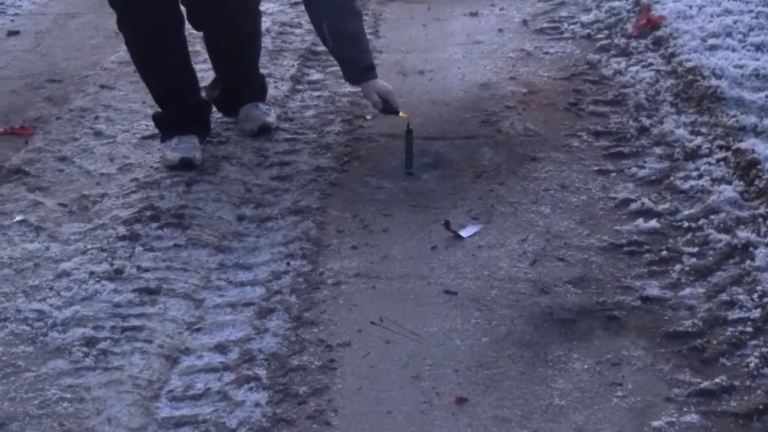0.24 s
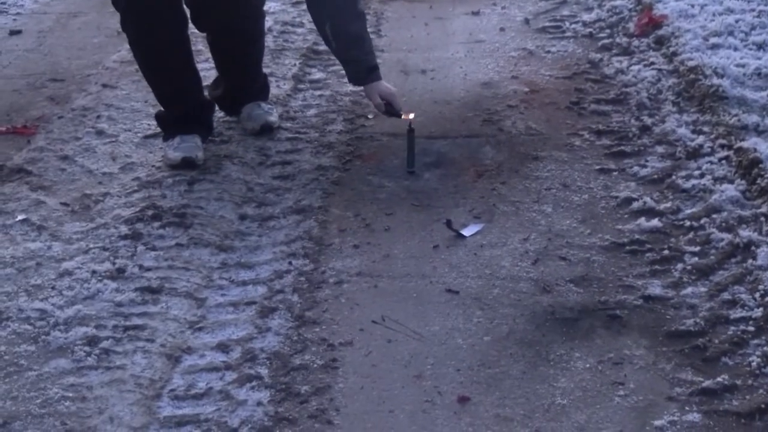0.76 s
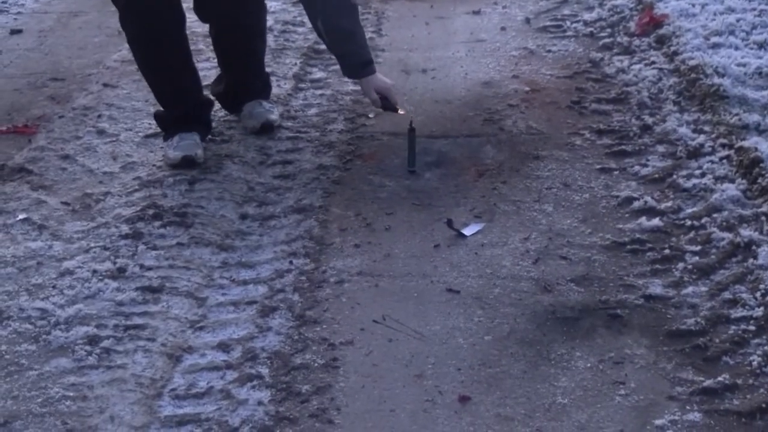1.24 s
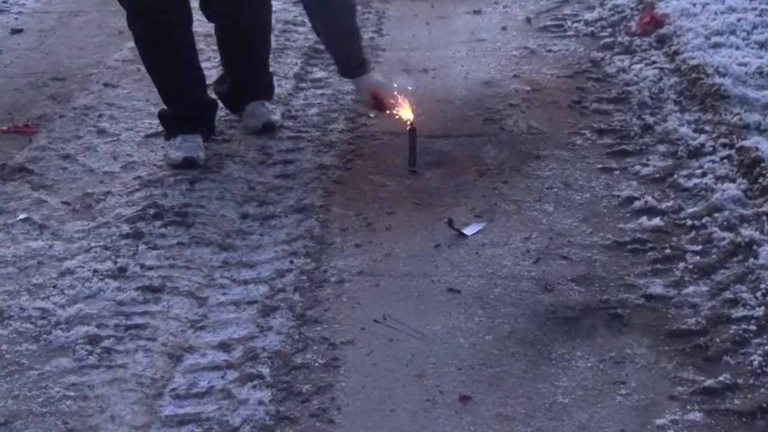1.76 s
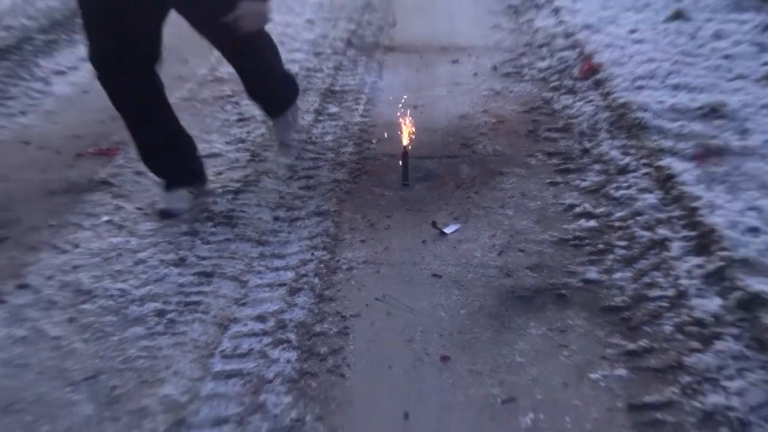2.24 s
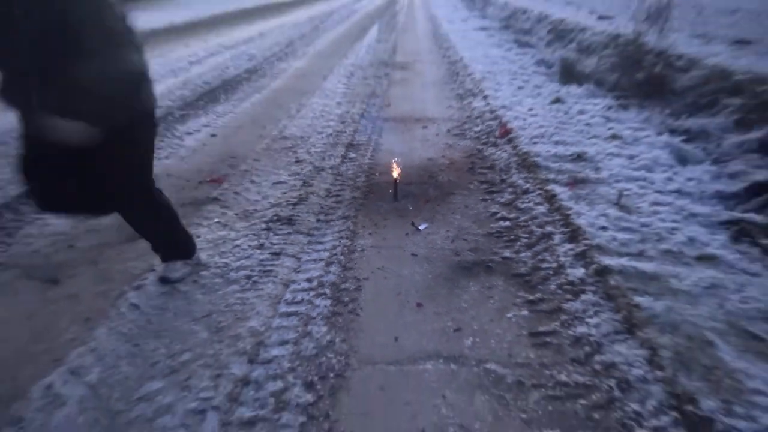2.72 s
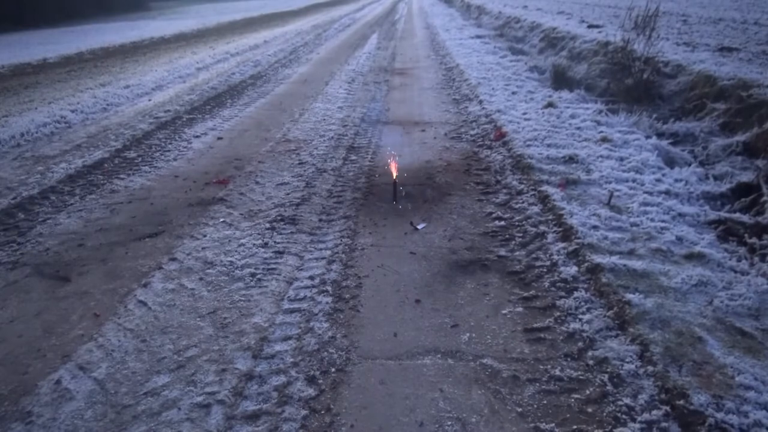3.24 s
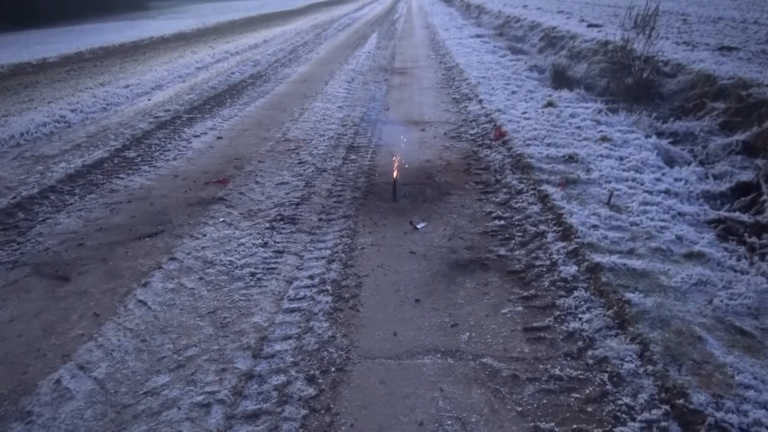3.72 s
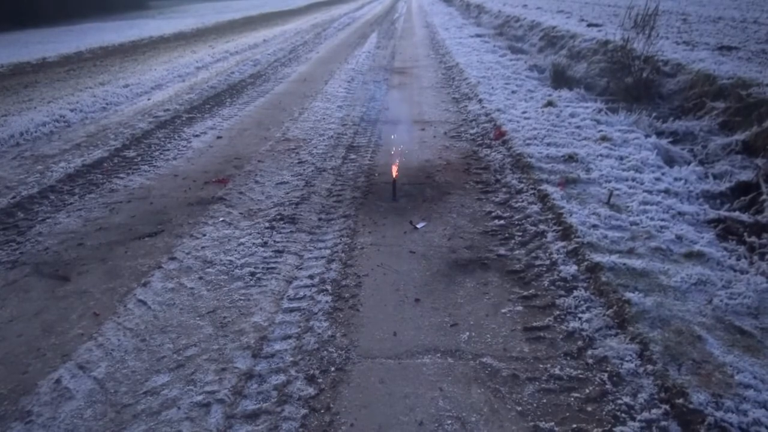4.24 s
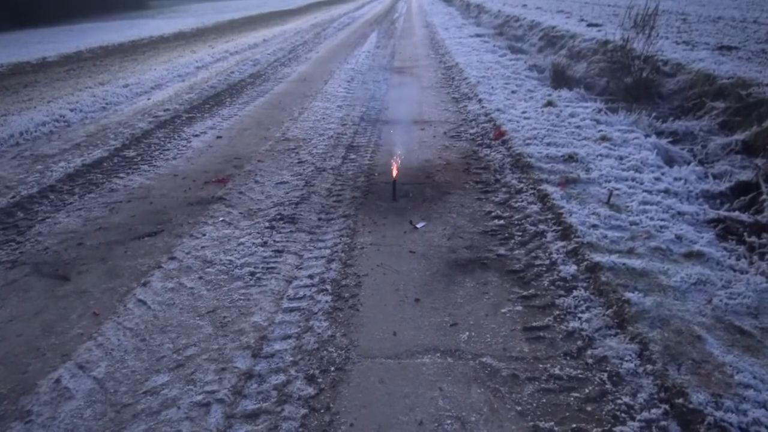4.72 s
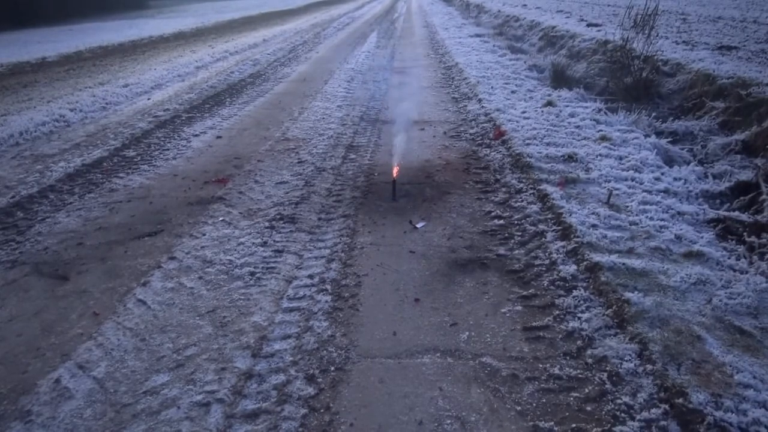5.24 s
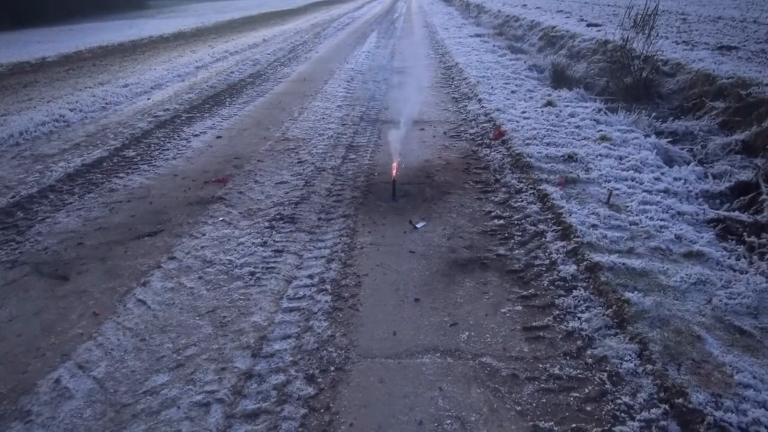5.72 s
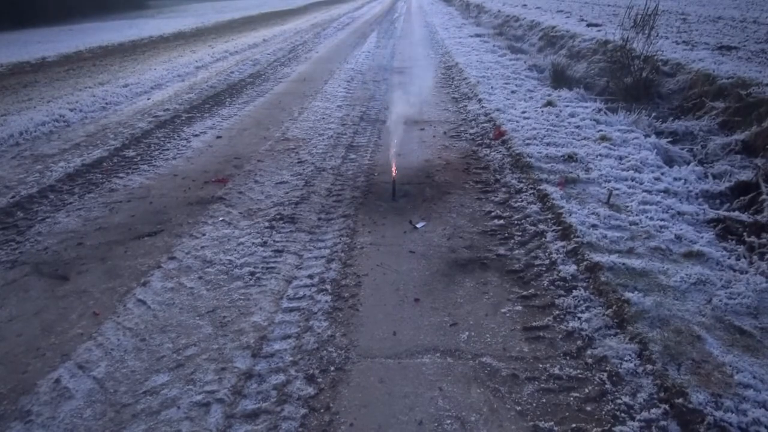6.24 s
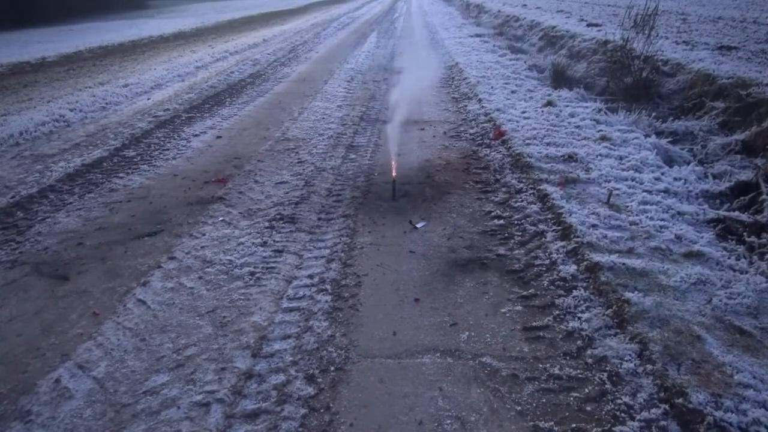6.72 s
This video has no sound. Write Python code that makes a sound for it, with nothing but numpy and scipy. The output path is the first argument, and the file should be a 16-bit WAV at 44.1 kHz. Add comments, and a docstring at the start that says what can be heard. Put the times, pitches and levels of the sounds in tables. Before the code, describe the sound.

Right at the start a lighter snaps with a short, sharp metallic ring, the loudest sound, slightly to the right. Faint dry ticks and soft sleeve rustles follow. At about 1.6 seconds a firework fuse catches and builds into a bright, sputtering hiss that lasts to the end near 7 seconds, turning softer and duller from about 5 seconds. From 2 seconds someone runs past from right to left, with dull heel knocks, scraping soles and gritty crunches of frost, strongest around 3 seconds and fading after 4. From about 4 to 6.5 seconds lighter feet shift and crunch close by on the right. Soft, deep handling bumps nudge the microphone near 0.6 seconds and again between 2 and 3.5 seconds, when a low wind rumble swells a little. Quiet open air with a far hum lies underneath throughout.

```python
"""An open frosty field. A lighter snaps with a short metallic ring, and a sleeve rustles among dry ticks.
At 1.6 s a firework fuse catches and hisses to the end, its echo off the frozen ground combing the hiss.
From 2 s someone runs past, right to left, heels knocking and frost crunching; then lighter feet shift
on the right. Wind and soft handling bumps nudge the microphone, over still air and a far hum."""
import sys
import numpy as np
from scipy import signal
from scipy.fft import rfft, irfft
from scipy.io import wavfile
from scipy.ndimage import uniform_filter1d

SR = 44100
rng = np.random.default_rng(int(sys.argv[2]) if len(sys.argv) > 2 else 0)


def wrap_up_sound(samples):
    """Save the sound to the file named by the first command line argument, as 16-bit audio."""
    columns = np.atleast_2d(samples).T
    # keep every value between -1 and 1, then stretch to whole-number steps
    tamed = np.clip(columns, -1, 1)
    steps = np.round(tamed * 32767).astype(np.int16)
    wavfile.write(sys.argv[1], SR, steps)


N = 307377
T = np.arange(N) / SR

# the runner's path; every pan is left minus right: (time [s], scuff level [dB], pan [dB])
RUNNER = [(1.7, -38, -10), (1.9, -55, -7), (2.24, -52, -7), (2.4, -47, -7.5), (3.2, -48.5, -2),
          (3.8, -49, 6.5), (4.05, -55.5, 9), (4.2, -51, 16), (4.7, -61.5, 10), (5.3, -63.5, 10),
          (6.3, -63, -5)]
NEAR_PAN_DB = -11  # feet shifting close by, on the right


def fuse():
    """A sputtering gas jet plus its delayed ground echo, which combs the hiss."""
    # the burn: (time [s], level [dB], tilt above 3 kHz [dB/octave])
    burn = [(1.625, -74, 2), (1.64, -57, 2), (1.72, -48, -0.2), (1.95, -43, 0.5), (2.3, -42, 1),
            (2.8, -42, 1.2), (3, -39.5, -3.5), (3.15, -42, 1.7), (3.57, -40, -0.3), (3.8, -45.5, 0.8),
            (4, -41.5, -0.8), (4.36, -44, 1.6), (4.42, -44.5, -4.5), (4.57, -44, -0.1), (4.85, -44.5, -2),
            (5.1, -42.5, -4.5), (5.6, -46.5, -4.5), (6.3, -48, -4.5), (6.97, -49, -6)]
    # tone of the jet: (frequency [Hz], level [dB])
    jet = [(250, -22), (600, -18), (1500, 2.5), (3000, -3.5), (6000, -2), (9000, -1.5), (13000, -4.5),
           (16000, -7.5)]
    # bands of the hiss that swell: (time [s], centre [Hz], boost [dB], half-length [s])
    flares = [(3.45, 14600, 3.5, 0.43), (3.9, 8900, 4.5, 0.8), (4.64, 12000, 6.5, .2), (6.5, 6400, 6, 0.45)]
    hz, t = grid(size=256)
    lit_s = burn[0][0]
    colour_db = along(burn, 1, t) + along(burn, 2, t) * np.log2(np.maximum(hz, 3000) / 3000)
    for s, centre_hz, db, half_s in flares:
        colour_db += db * np.exp(-((hz - centre_hz) / 1300) ** 2 - ((t - s) / half_s) ** 2)
    echo = .6 + .3 / (1 + (hz / 2500) ** 4)
    spacing_hz = np.minimum(2600 + 142 * (t - lit_s), 3055)  # the comb glides up, then holds
    comb = abs(1 + echo * np.exp(-2j * np.pi * hz / spacing_hz))
    sputter_db = 0.81 * evened(uniform_filter1d(rng.standard_normal(len(t)), size=4))
    gain = gain_of(read(jet, hz) + colour_db + sputter_db) * comb * (t > lit_s)
    return panned(noise(gain, same=.93 - 0.52 * hz / 15000, patchy_db=1.7), pan_db=-9)


def footfalls():
    """Heel and sole knock on hard ground; the weight lands just after, about an octave lower."""
    # (time [s], knock peak [dB], nominal pitch [Hz], weight peak [dB])
    thuds = [(2.3298, -26, 272, -36), (2.345, -24.5, 278, -52), (2.3575, -24, 470, -43),
             (2.7088, -28.5, 374, -31.5), (2.825, -31, 393, -48), (2.848, -31, 496, -50),
             (2.963, -29.5, 333, -38), (3.0116, -23, 405, -26.5), (3.1044, -26, 417, -42),
             (3.144, -35, 445, -55), (3.4079, -27.5, 394, -26.5), (3.64, -35, 398, -55),
             (3.7463, -33, 157, -55), (3.7575, -27, 325, -32.5), (3.84, -35, 580, -55),
             (4.096, -37.5, 228, -52), (4.162, -39, 440, -55), (4.194, -37.5, 362, -59),
             (4.45, -37.5, 204, -55), (4.832, -42, 440, -55), (5.1958, -38.5, 337, -35),
             (5.996, -45, 300, -42), (6.536, -44, 128, -56)]
    out = np.zeros((2, N))
    for s, db, hz, weight_db in thuds:
        pan_db = along(RUNNER, 2, s) if s < 5.5 else NEAR_PAN_DB
        add(out, s, panned(knock(db, hz), pan_db))
        add(out, s + 0.0045, panned(knock(weight_db, 0.492 * hz), pan_db))
    return out


def knock(db, hz):
    """One dull, fast-dying thump whose pitch sags as the sole flattens."""
    t = np.arange(6000) / SR
    turns = hz * np.log(1 + 260 * t) / 160
    envelope = np.exp(-1.1 * min(hz, 330) * t) * np.minimum(10 * hz * t, 1)
    thump = -np.sin(2 * np.pi * turns) * envelope
    thump = signal.lfilter(*signal.butter(2, 2.9 * hz, fs=SR), thump)  # rubber blunts the edge
    return gain_of(db) * thump[None] / abs(thump).max()


def frost_crunch():
    """Frost breaks under a shoe in short, gritty bursts."""
    # (time [s], length [ms, capped at 130], lateness of the peak [exponent], level [dB], tilt [dB/octave])
    crunches = [(2.02, 100, 0.46, -42, 2), (2.09, 40, 0.66, -48.5, 9), (2.295, 95, 0.98, -28, -0.6),
                (2.46, 106, 0.51, -41.5, -3.5), (2.633, 48, 0.74, -37, 4), (2.711, 86, 0.36, -31.5, 1.5),
                (2.8, 103, 0.8, -33.5, -3), (2.926, 57.5, 1.4, -27, -0.4), (3.012, 34, 0.22, -24, -1.2),
                (3.05, 79, 0.31, -34, -1.5), (3.1, 120, 0.33, -34.5, -1.2), (3.18, 140, 0.28, -38.5, 2.5),
                (3.265, 43, 0.73, -33.5, 4), (3.411, 38, 0.35, -28, -0.6), (3.46, 75, 0.69, -33.5, -0.7),
                (3.525, 64, 0.62, -39.5, -3.5), (3.576, 30, .75, -36.5, -0.5), (3.745, 41, .88, -35, -5),
                (3.835, 32, 0.91, -45, -7.5), (4.23, 73, 0.68, -39.5, -2.5), (4.276, 67, 0.59, -51, 10),
                (4.397, 88, 0.94, -33, -1), (4.461, 59, .7, -39.5, -1), (4.525, 45, 0.54, -43, 0),
                (5.525, 87, 0.29, -43.5, .2), (5.579, 75, 0.59, -49, 2.5), (5.93, 52, 1.4, -45, -2),
                (5.986, 51, 0.75, -47.5, 3.5)]
    # tone of breaking frost: (frequency [Hz], level [dB])
    frost = [(60, -19), (350, 2.5), (800, 0.2), (1700, -1.5), (3200, -8.5), (6000, -12), (9000, -13.5),
             (16000, -27)]
    out, t = np.zeros((2, N)), np.arange(6000) / SR
    hz = np.fft.rfftfreq(len(t), 1 / SR)
    octaves = np.log2(np.clip(hz, 350, 6000) / 1700)
    thin_db = -11 * np.clip(-octaves / 2, 0, 1)
    for s, ms, late, db, tilt_db in crunches:
        near = s > 4  # a light foot close by: less low end
        colour_db = read(frost, hz) + db + tilt_db * octaves + near * thin_db
        grains = grit(len(t), per_s=7000, spread_db=1.8, same=0.93)
        crunch = irfft(rfft(grains) * gain_of(colour_db), len(t))
        progress = np.minimum(1000 * t / min(ms, 130), 1)
        swell = np.sin(np.pi * progress ** np.clip(late, .3, 1.5))
        add(out, s, panned(crunch * swell, NEAR_PAN_DB if near else along(RUNNER, 2, s)))
    return out


def scuffing():
    """Soles scrape between the steps, swinging less far left than the footfalls."""
    # tone of the soles: (frequency [Hz], level [dB])
    soles = [(90, 6.5), (200, -1.5), (450, 0.5), (900, -4), (1400, -5.5), (4000, -15), (16000, -20)]
    scuff = coloured(grit(N, per_s=1500, spread_db=2.6, same=0.68), lambda f: gain_of(read(soles, f)))
    fade = np.clip(np.minimum(T - RUNNER[0][0], RUNNER[-1][0] - T) / 0.32, 0, 1)
    pan_db = along(RUNNER, 2)
    return panned(scuff * gain_of(along(RUNNER)) * fade, np.minimum(pan_db, 0.27 * pan_db))


def lighter():
    """The snap rings the lighter and scatters off hands and ground."""
    # (time [s], peak of the direct ring [dB], pan [dB])
    snaps = [(0.0379, -6, -9)]
    # the lighter's modes: (frequency [Hz], level [dB], time to fall 60 dB [s])
    modes = [(2000, -6.5, 0.006), (2770, -16, 0.013), (4750, -4.5, 0.0079), (6900, -7, 0.0041),
             (8140, 6.5, 0.0034), (9030, -3.5, .005), (11400, 8, 0.0019), (13950, -4, 0.003)]
    out, t = np.zeros((2, N)), np.arange(2000) / SR
    ring = sum((-1) ** k * gain_of(db - 60 * t / t60) * np.sin(2 * np.pi * hz * t)
               for k, (hz, db, t60) in enumerate(modes))
    ring *= np.minimum(t / 0.00026, 1)
    ring = signal.sosfilt(signal.butter(4, 1500, "high", fs=SR, output="sos"), ring)
    scatter = gain_of(-30 - 60 * t / 0.04) * (t > .0012) * rng.standard_normal((2, len(t)))
    scatter[:, 0] = 1  # the direct sound
    snap = signal.fftconvolve(ring[None], scatter, axes=1)
    for s, db, pan_db in snaps:
        add(out, s, panned(gain_of(db) * snap / abs(ring).max(), pan_db))
    return out


def dry_ticks():
    """Each tick is a fast-dying band of noise; higher ticks are broader."""
    # (time [s], peak [dB], centre [Hz], pan [dB])
    ticks = [(.0782, -50, 1900, -10), (.221, -55, 2980, -12), (.2643, -49, 2980, -14),
             (0.303, -37.5, 5860, -25), (.3386, -41.5, 3000, -25), (0.355, -38.5, 6000, -30),
             (.433, -54, 9000, -16), (.5085, -49, 9500, -16), (0.621, -52, 6000, -7.5),
             (0.628, -53, 2500, -9), (.726, -57, 1400, -9), (0.865, -50, 2420, -14),
             (1.1568, -53, 5000, -16), (1.6357, -50, 5700, -17), (1.6487, -47, 3000, -21),
             (1.8816, -37, 4030, -8.5), (4.537, -33, 1530, -10), (4.5537, -35.5, 1450, -7),
             (5.525, -51, 2200, -7)]
    out, t = np.zeros((2, N)), np.arange(2000) / SR
    for s, db, hz, pan_db in ticks:
        octaves = 0.4 * (hz / 1000) ** 0.52
        tick = coloured(rng.standard_normal((1, len(t))), band(hz, octaves)) * gain_of(-60 * t / 0.022)
        add(out, s, panned(gain_of(db) * tick / abs(tick).max(), pan_db))
    return out


def sleeve():
    """Fine cloth crackle over a duller rub; both swell and die with each movement."""
    # (time of the peak [s], crackle level [dB], rub level [dB])
    movements = [(.08, -88, -74), (.23, -87, -73), (.29, -77, -73), (.36, -54.5, -70), (.56, -68, -72),
                 (.63, -84, -85), (.76, -75, -69), (1.07, -66, -67.5), (1.16, -70, -63.5),
                 (1.29, -71, -68.5), (1.4, -72, -66.5), (1.655, -59.5, -64)]
    # tone of the crackle: (frequency [Hz], level [dB])
    cloth = [(900, -3.5), (2000, -9.5), (4000, -7), (8000, -6), (16000, -17)]
    swell_db_per_s, die_db_per_s = 202, 134
    crackle = coloured(grit(N, per_s=9000, spread_db=5.4, same=0.65), lambda f: gain_of(read(cloth, f)))
    rub = coloured(grit(N, per_s=6000, spread_db=2.4, same=0.74), band(1500, octaves=0.86))
    rustle = np.zeros((2, N))
    for s, crackle_db, rub_db in movements:
        drop_db = np.maximum(swell_db_per_s * (s - T), die_db_per_s * (T - s))
        rustle += crackle * gain_of(crackle_db - drop_db) + rub * gain_of(rub_db - drop_db)
    return panned(rustle, pan_db=-16)


def handling():
    """Soft, deep bumps of the hand-held microphone's body."""
    # (time [s], peak [dB], length [ms])
    bumps = [(0.589, -31.5, 77), (.671, -39.5, 61), (.86, -46, 40), (2.12, -42, 89), (2.8, -36.5, 64),
             (2.85, -34, 95), (3.231, -30.5, 88), (3.31, -40, 48), (3.45, -49, 70)]
    out, bump_hz = np.zeros((2, N)), 39.7
    for s, db, ms in bumps:
        t = np.arange(0, ms / 1000, 1 / SR)
        bump = np.sin(2 * np.pi * bump_hz * t + [[1.2], [0]]) * np.hanning(len(t))
        add(out, s, panned(gain_of(db) * bump, pan_db=-4))
    return out


def wind():
    """Lumpy low pressure, nearly unrelated at the microphone's two ports."""
    # (time [s], level [dB])
    gusts = [(0, -59), (1, -60.5), (2, -65), (2.5, -64), (3, -53), (3.5, -51), (4, -72), (5, -66), (7, -74)]
    hz, t = grid(size=4096)
    low_band = 1 / (1 + (hz / 50) ** 5) / (1 + (24 / (hz + 1)) ** 5)
    rumble = noise(low_band + 0 * t, same=0.082, patchy_db=1.5)
    return panned(evened(rumble) * gain_of(along(gusts)), pan_db=-8)


def air():
    """A steady bed of still air, far hum and microphone hiss, leaning right."""
    # (frequency [Hz], level [dB])
    tone = [(15, -19), (25, -51), (59, 2), (153, -1.5), (270, -12), (476, -11.5), (800, -16), (1150, -22.5),
            (1500, -26.5), (3250, -28), (7000, -30), (10000, -35), (13000, -31.5), (16000, -38)]
    # (frequency [Hz], left-right likeness [0-1])
    likeness = [(60, 0.74), (180, 0.79), (550, 0.7), (1650, 0.33), (4970, 0.027), (15000, 0.11)]
    # (frequency [Hz], pan [dB])
    balance = [(60, -6), (180, -4.5), (550, -5.5), (1650, -6.5), (4970, -4.5), (15000, -2)]
    hz, t = grid(size=2048)
    bed = noise(gain_of(read(tone, hz) + 0 * t), same=read(likeness, hz), patchy_db=1.75)
    lean = gain_of(.5 * read(balance, np.fft.rfftfreq(N, 1 / SR)))
    bed = irfft(rfft(bed) * [lean, 1 / lean], N)
    return gain_of(-54) * bed / np.sqrt(np.mean(bed.mean(0) ** 2))


def gain_of(db):
    """Decibels to gain."""
    return 10 ** (np.asarray(db) / 20)


def evened(x):
    """Scales to rms 1."""
    return x / np.sqrt(np.mean(np.abs(x) ** 2) + 1e-20)


def read(points, hz):
    """Reads a spectrum table on a log-frequency axis."""
    f, value = np.transpose(points)
    return np.interp(np.log(hz + 1), np.log(f + 1), value)


def along(rows, column=1, t=T):
    """Reads one column of a curve in time."""
    return np.interp(t, [r[0] for r in rows], [r[column] for r in rows])


def add(mix, s, sound):
    """Mixes a stereo sound in at s seconds."""
    part = mix[:, round(s * SR):][:, :sound.shape[1]]
    part += sound[:, :part.shape[1]]


def panned(x, pan_db):
    """Pans with two gains whose mean is one; positive is left."""
    g = gain_of(pan_db)
    return np.array([2 * g / (1 + g) * x[0], 2 / (1 + g) * x[-1]])


def grid(size):
    """Frequencies (column) and times (row) of short-time spectra."""
    return np.fft.rfftfreq(size, 1 / SR)[:, None], np.arange(N * 4 // size + 5) * size / 4 / SR


def noise(gain, same, patchy_db):
    """Stereo noise shaped on the grid, with drifting patches; `same` is the left-right likeness."""
    bins, frames = gain.shape
    a, b, c, d, patches = rng.standard_normal((frames, bins, 5)).T
    patches = evened(uniform_filter1d(uniform_filter1d(patches, size=7, axis=0), size=12, axis=1))
    left = a + 1j * b
    right = same * left + np.sqrt(1 - same ** 2) * (c + 1j * d)
    spectra = np.array([left, right]) * gain * gain_of(patchy_db * patches)
    size = 2 * (bins - 1)
    return signal.istft(spectra, nperseg=size, noverlap=size * 3 // 4)[1][:, :N] / np.sqrt(size * 4 / 3)


def grit(count, per_s, spread_db, same):
    """A stereo train of snaps of very uneven size, partly shared by both sides."""
    hit = rng.random((count, 2)) < per_s / SR
    sizes = gain_of(spread_db * np.minimum(rng.exponential(1, (count, 2)), 4))
    left, other = (hit * sizes * rng.standard_normal((count, 2))).T
    return evened([left, same * left + np.sqrt(1 - same ** 2) * other])


def band(centre_hz, octaves):
    """A band-pass curve, 6 dB down at `octaves` either side."""
    return lambda f: 1 / (1 + (np.log2((f + 1) / centre_hz) / octaves) ** 4)


def coloured(x, gain):
    """Filters by a gain given as a function of frequency; rms 1."""
    hz = np.fft.rfftfreq(x.shape[1], 1 / SR)
    return evened(irfft(rfft(x) * gain(hz), x.shape[1]))


def scene():
    """All sources in the open air, from the bed up."""
    bed = air() + wind() + handling()
    hands = lighter() + dry_ticks() + sleeve()
    return bed + hands + fuse() + footfalls() + frost_crunch() + scuffing()


def record(dry):
    """A steep low-pass trims the very top."""
    low_pass = signal.firwin(511, 15850, window=("kaiser", 9), fs=SR)
    return signal.oaconvolve(dry, low_pass[None], "same")


dry = scene()
out = record(dry)
wrap_up_sound(out)
```